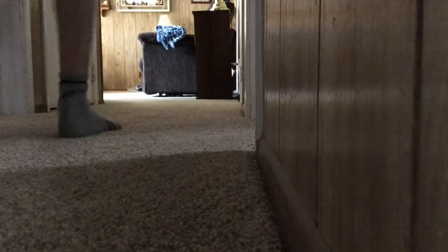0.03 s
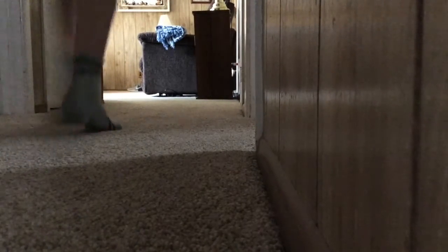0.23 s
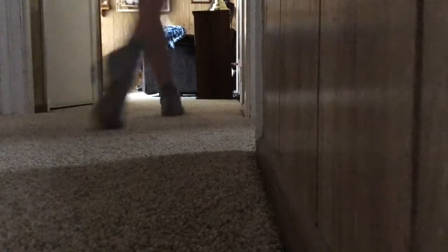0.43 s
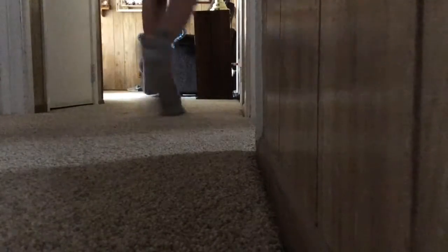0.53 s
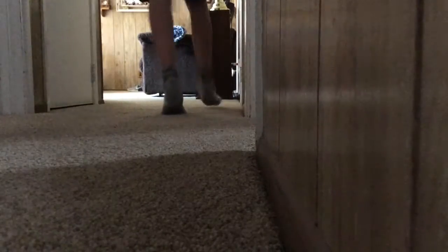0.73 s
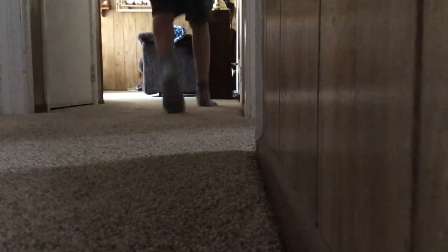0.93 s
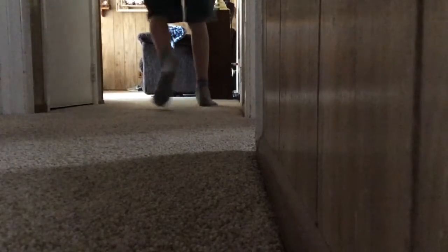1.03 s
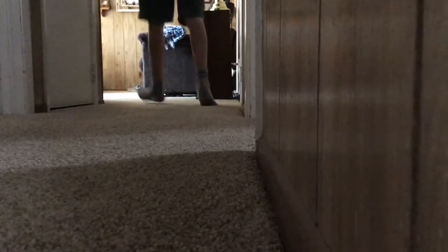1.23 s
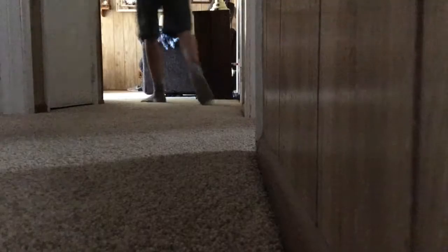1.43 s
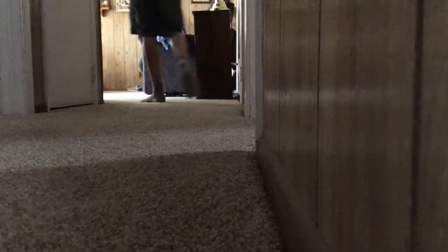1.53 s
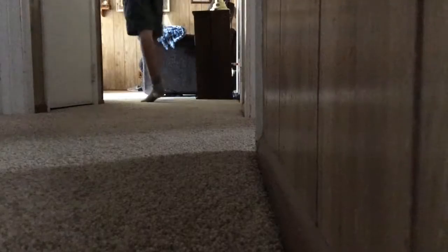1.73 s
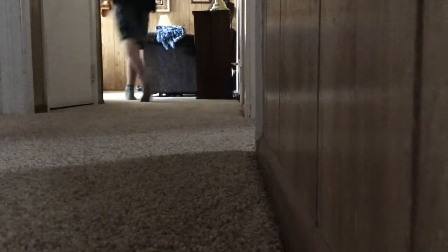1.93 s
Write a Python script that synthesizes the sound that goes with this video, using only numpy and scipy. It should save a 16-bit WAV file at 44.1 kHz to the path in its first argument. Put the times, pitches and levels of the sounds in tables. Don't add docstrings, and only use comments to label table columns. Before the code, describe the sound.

Soft footsteps in socks walk away down a carpeted hallway, the first thud close and loudest

```python
import sys
import numpy as np
from scipy import signal
from scipy.io import wavfile
from scipy.ndimage import uniform_filter1d

SR = 44100
rng = np.random.default_rng(int(sys.argv[2]) if len(sys.argv) > 2 else 0)


def magnitude_from_level(level_db):
    exponent = np.asarray(level_db, float) / 20
    return 10 ** exponent


def wav_out(sig):
    wavfile.write(sys.argv[1], SR, np.round(np.clip(np.atleast_2d(sig).T, -1, 1) * 32767).astype(np.int16))


N = 88200


def evened(x):
    return x / np.sqrt(np.mean(x ** 2) + 1e-20)


def read(points, hz):
    f, value = np.transpose(points)
    return np.interp(np.log(hz + 1), np.log(f + 1), value)


def add(mix, s, sound):
    part = mix[round(s * SR):][:len(sound)]
    part += sound[:len(part)]


def resonate(x, hz, width):
    return signal.lfilter(*signal.iirpeak(hz, hz / width, SR), x)


def noise(points, patchy_db=0.):
    hz = np.fft.rfftfreq(1024, 1 / SR)
    real, imaginary, patches = rng.standard_normal((N // 256 + 5, 513, 3)).T
    patches = uniform_filter1d(patches, size=14, axis=0)
    patches = evened(uniform_filter1d(patches, size=8, axis=1))
    level_db = read(points, hz)[:, None] + patchy_db * patches
    spectrum = (real + 1j * imaginary) * magnitude_from_level(level_db)
    return evened(signal.istft(spectrum, nperseg=1024, noverlap=768)[1][:N])


# f/Hz, level/dB; then its overall level/dB
HUSH_SPECTRUM = [(35, -0.5), (77, 3), (350, -12.5), (800, -21), (1400, -24), (9800, -27.5), (11500, -28.5),
                 (15300, -39.5)]
HUSH_LEVEL_DB = -56.5
# f/Hz, width/Hz, level/dB
CAPSULE = (8850, 1850, 0.91)


def hush():
    steady = noise(HUSH_SPECTRUM, patchy_db=0.46)
    hz, width, db = CAPSULE
    return magnitude_from_level(HUSH_LEVEL_DB) * (steady + magnitude_from_level(db) * resonate(steady, hz, width))


# f/Hz, t60/s
HALL_DECAY = [(80, 0.72), (300, 0.31), (1000, .3), (4000, 0.33), (12000, 0.29)]


def hall(x):
    taps, at = np.zeros(SR // 2), np.arange(200, SR // 2 - 20, 20)
    taps[at + rng.integers(0, 20, len(at))] = rng.choice([-1., 1.], len(at))
    hz, t, bands = signal.stft(taps, SR, nperseg=512)
    decay = magnitude_from_level(-60 * t / read(HALL_DECAY, hz)[:, None])
    tail = signal.istft(bands * decay, SR, nperseg=512)[1]
    tail[:200] = 0
    return signal.fftconvolve(x, tail / np.linalg.norm(tail))[:N]


# centre t/s, half length/s, hiss level/dB, rumble level/dB
STROKES = [
    (0.06, 0.024, -83, -42.5),
    (0.214, .16, -55.5, -52.5),
    (0.587, 0.11, -57.5, -50.5),
    (.68, 0.028, -54, -61),
    (0.818, 0.12, -60.5, -63.5),
    (1.036, 0.15, -58.5, -53.5),
    (1.298, 0.054, -65, -55.5),
    (1.487, 0.09, -58.5, -57.5),
    (1.651, 0.062, -62, -58),
    (1.906, 0.24, -63, -61),
]
# f/Hz, level/dB
PILE_SPECTRUM = [(1000, -1), (1700, -5.5), (2500, -3.5), (3400, -3.5), (7500, -9), (9500, -11.5),
                 (15000, -30)]
# f/Hz, level/dB
PAD_SPECTRUM = [(30, -28), (70, -6), (200, -2), (600, -7.5), (1000, -14), (1600, -34)]


def drags():
    t = np.arange(N) / SR
    swell = np.array([np.exp(-((t - s) / half) ** 2) for s, half, _, _ in STROKES])
    _, _, hiss_db, rumble_db = np.array(STROKES).T
    hiss = magnitude_from_level(hiss_db) @ swell * noise(PILE_SPECTRUM, patchy_db=3.5)
    rumble = magnitude_from_level(rumble_db) @ swell * noise(PAD_SPECTRUM, patchy_db=1.5)
    return hiss, rumble


# t/s, level/dB, f/Hz, length/s
FIBRE_CATCHES = [(.039, -39.5, 1160, 0.018), (.043, -48.5, 520, 0.014), (0.052, -53, 1540, 0.018),
                 (.061, -46, 1000, 0.025), (.062, -59, 1600, 0.0088), (.53, -38, 497, 0.013),
                 (.265, -54, 6700, 0.0095), (.592, -51.5, 690, .012), (.626, -45.5, 730, 0.014),
                 (0.325, -60, 3380, 0.012), (0.166, -76, 4070, 0.008), (0.251, -53, 4660, 0.0083),
                 (0.547, -55, 2940, 0.014), (.753, -55, 2680, 0.011), (0.782, -58, 4400, 0.045),
                 (0.807, -58, 2420, 0.038), (.874, -51.5, 4170, 0.019), (1.33, -60.5, 2200, 0.014),
                 (1.435, -60, 2670, 0.023), (1.4638, -50, 3350, .007), (1.472, -48.5, 4980, 0.0084),
                 (1.5262, -41.5, 3740, 0.011), (1.601, -59, 4210, 0.025), (1.64, -51, 4170, 0.022),
                 (1.801, -56.5, 3700, 0.0073), (1.877, -50.5, 4060, 0.011), (1.9017, -44.5, 3810, .012),
                 (1.93, -57, 4000, 0.036), (1.969, -57, 3950, 0.016)]


def catches():
    relative_width, air_db, rise_s = 0.38, -10, 0.0024
    out, t = np.zeros(N), np.arange(3000) / SR
    for s, db, hz, length in FIBRE_CATCHES:
        grain, drift = rng.standard_normal((2, 3000))
        grit = grain * magnitude_from_level(3.8 * evened(uniform_filter1d(drift, size=60)))
        width = relative_width * hz
        body = evened(resonate(resonate(grit, hz, width), hz, 2 * width))
        air = evened(resonate(grit, 1.8 * hz, 0.69 * hz))
        tone = body + magnitude_from_level(air_db) * min(hz / 3500, 1) ** 2 * air
        add(out, s, magnitude_from_level(db) * tone * np.minimum(t / rise_s, 1) * np.exp(-(t / length) ** 2))
    return out


# t/s, level/dB, fall/s
CRACKS = [
    (0.9788, -29, 0.0068),
    (0.984, -28.5, 0.0041),
    (0.9878, -33, 0.0055),
    (0.997, -42.5, 0.018),
]
# f/Hz, level/dB
CRACK_SPECTRUM = [(1200, -44), (2300, -12.5), (5000, -15), (6900, -15), (8300, 0), (11000, -14.5),
                  (15000, -26), (15800, -53)]
# f/Hz, width/Hz, level/dB
CRACK_RING = (5890, 700, -4)


def snap():
    rise_s, ring_until_s, ring_fade_s = 0.00098, .988, 0.0036
    t, bright, shape = np.arange(2000) / SR, noise(CRACK_SPECTRUM), np.zeros(N)
    for s, db, fall in CRACKS:
        add(shape, s, magnitude_from_level(db) * np.minimum(t / rise_s, 1) * np.exp(-t / fall))
    hz, width, db = CRACK_RING
    ring = magnitude_from_level(db) * evened(resonate(resonate(bright, hz, width), hz, width))
    ring_gate = np.clip((ring_until_s - np.arange(N) / SR) / ring_fade_s, 0, 1)
    return shape * bright, shape * ring * ring_gate


# t/s, level/dB, f/Hz, board ring level/dB, length/cycles
PUSHES = [(.06, -8, 264, -13.5, 0.57), (0.069, -30, 137, -7, 1.2), (.0655, -13, 453, -5, 1.07),
          (0.0713, -11.5, 394, -4, 0.55), (.0785, -21, 176, -8, 0.61), (.099, -46, 252, -2, 0.44),
          (.257, -37.5, 117, -18, 0.42), (0.5205, -19, 593, -6, 0.94), (0.5425, -24.5, 71, -15, 0.41),
          (.595, -45, 91, -13, 0.5), (.615, -39, 92, -12, 0.46), (.661, -31.5, 550, -1, 1.3),
          (0.6633, -19, 139, -5.5, 0.32), (.673, -18.5, 213, -3.5, 0.3), (.95, -47.5, 680, 15, 1.23),
          (0.975, -39, 194, -8, 1.2), (.984, -27.5, 280, -3.5, 0.86), (.992, -39.5, 145, -4.5, 3.7),
          (1.242, -36, 380, -22, 0.57), (1.486, -47, 185, -4, 1.7), (1.558, -45, 107, -1, 0.74),
          (1.603, -59, 150, -3, 0.34), (1.813, -48.5, 126, 7, 0.46), (1.907, -44.5, 104, -17, 0.81)]
# f/Hz, level/dB, t60/s
BOARD_MODES = [(61.5, 5.5, 0.11), (92, 10, 0.13), (145, 4.5, 0.12), (233.8, -1, 0.26), (280, -3.5, 0.22),
               (361, -8, 0.1), (447.1, 3, 0.098), (602, 3.5, 0.027), (863, -5, .08), (1182, 7.5, 0.18)]


def thuds():
    rise_s, pad_hz = 0.0015, 1600
    push, strike, t = np.zeros(N), np.zeros(N), np.arange(SR // 2) / SR
    for s, db, hz, ring_db, cycles in PUSHES:
        phase = np.arange(8 * cycles * SR / hz) * hz / SR
        rise = 1 - np.exp(-(phase / hz / rise_s) ** 2)
        decay = np.exp(-(phase / cycles) ** 1.13)
        pulse = 2 * magnitude_from_level(db) * np.sin(2 * np.pi * phase) * rise * decay
        add(push, s, pulse)
        add(strike, s, pulse * magnitude_from_level(ring_db) * hz / 300)
    boards = sum(magnitude_from_level(db - 60 * t / t60) * np.sin(2 * np.pi * hz * t) for hz, db, t60 in BOARD_MODES)
    floor = push + 0.0041 * signal.fftconvolve(strike, boards)[:N]
    return signal.lfilter(*signal.butter(2, pad_hz, fs=SR), floor)


def scene():
    low, high = thuds(), catches()
    crack, ring = snap()
    hiss, rumble = drags()
    to_hall = magnitude_from_level(-10.5) * low + magnitude_from_level(-10.5) * crack + magnitude_from_level(-12) * high
    mix = low + high + hall(to_hall) + hiss + rumble + hush()
    edge = signal.firwin(801, 15400, window=("kaiser", 9), fs=SR)
    return (signal.oaconvolve(mix, edge, "same") + crack + ring)[None]


def low_pass(x):
    return signal.sosfilt(signal.butter(12, 16380, fs=SR, output="sos"), x)


def record(dry):
    bass_cut = signal.butter(3, 42, "high", fs=SR, output="sos")
    return low_pass(signal.sosfilt(bass_cut, dry))


dry = scene()
out = record(dry)
wav_out(out)
```